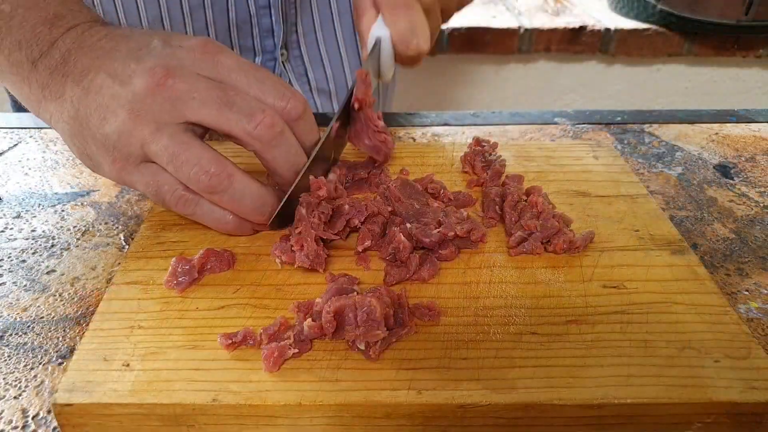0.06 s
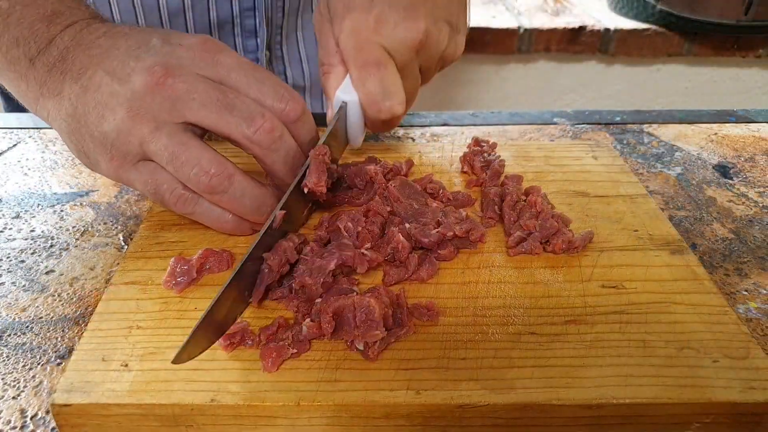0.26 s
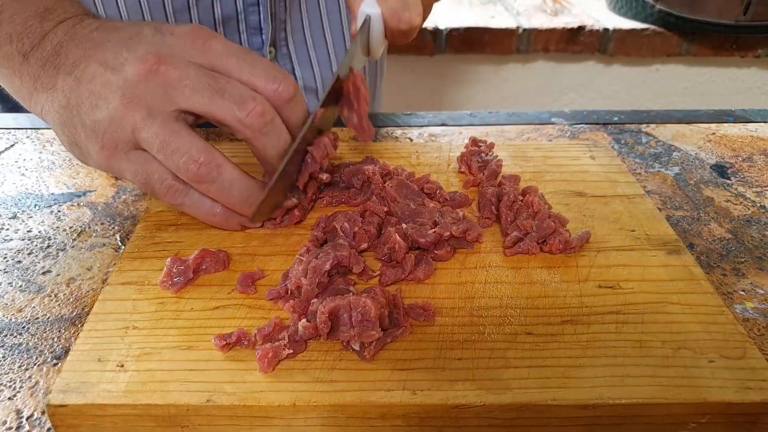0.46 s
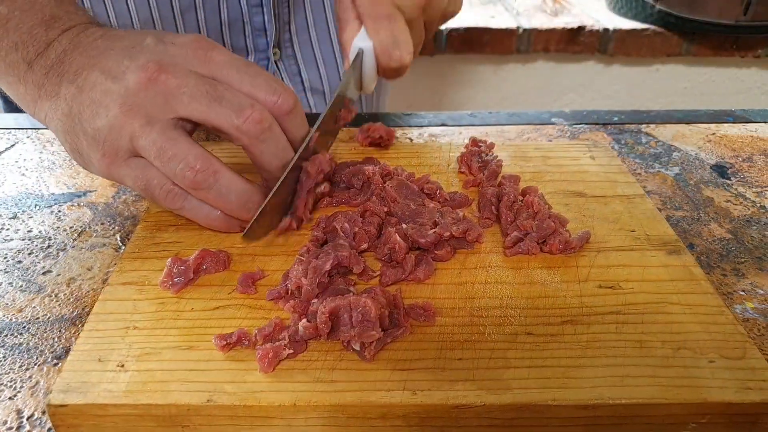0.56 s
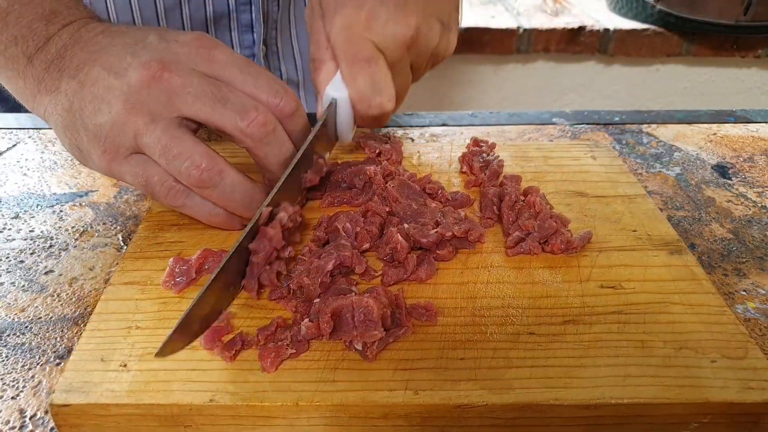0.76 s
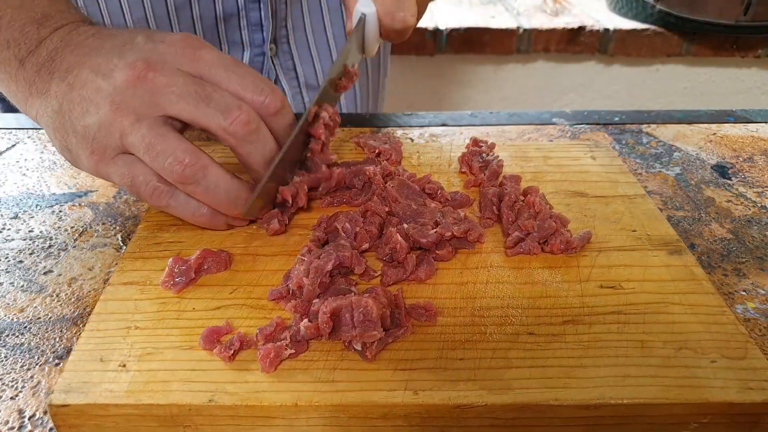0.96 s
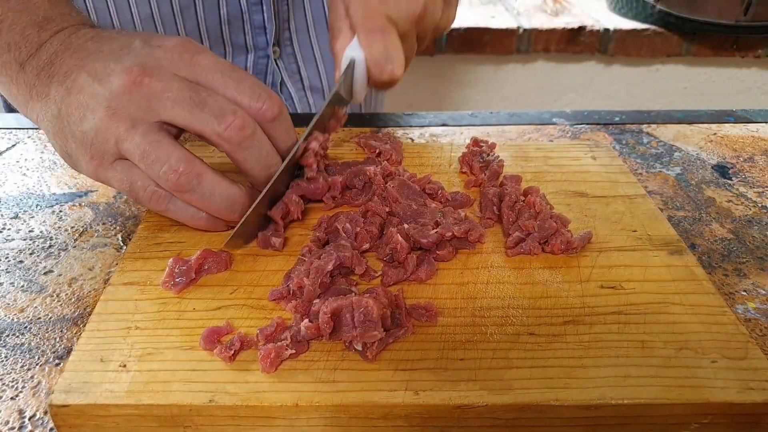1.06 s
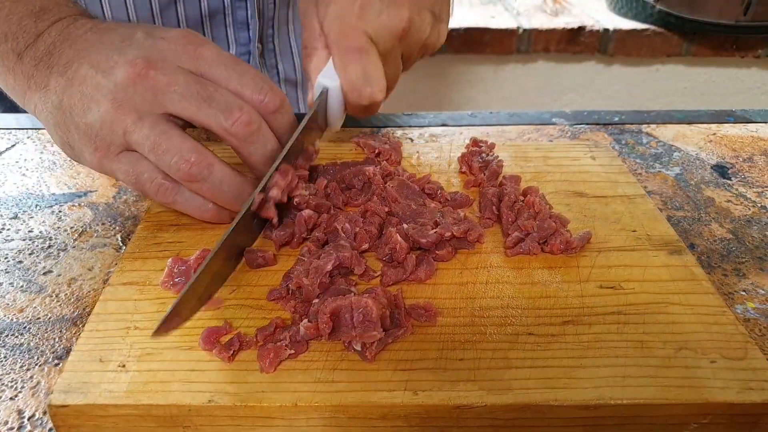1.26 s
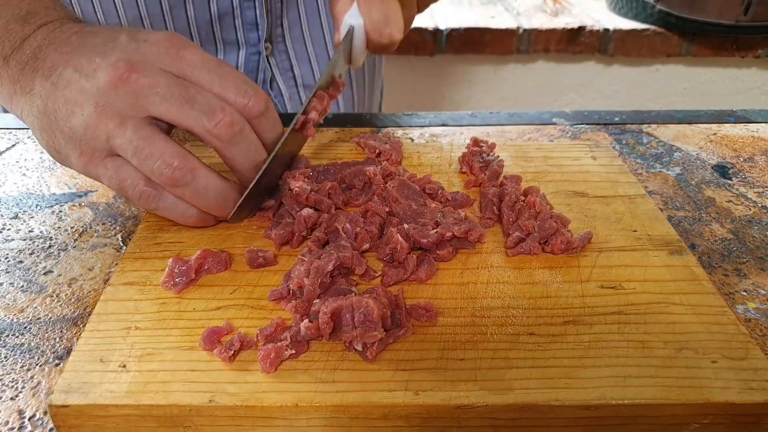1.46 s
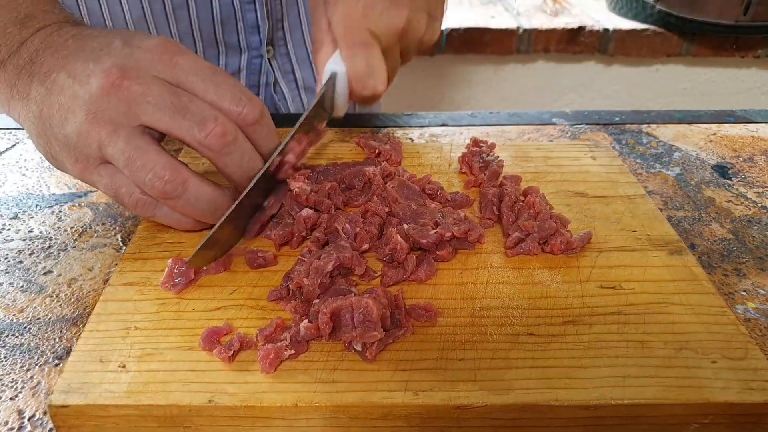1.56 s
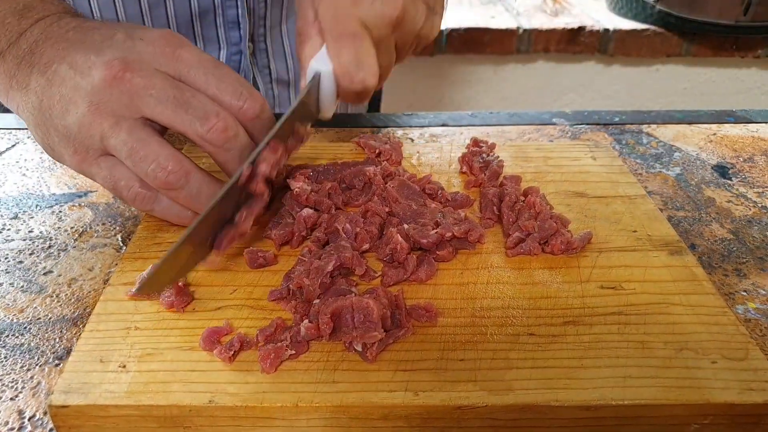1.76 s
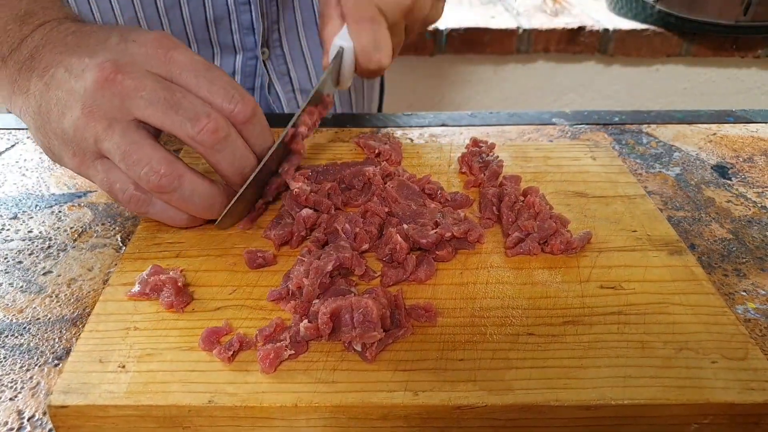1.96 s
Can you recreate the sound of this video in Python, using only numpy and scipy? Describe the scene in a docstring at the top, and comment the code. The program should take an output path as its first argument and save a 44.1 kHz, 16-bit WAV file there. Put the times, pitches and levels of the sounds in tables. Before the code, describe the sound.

Close up in a kitchen, a blade knocks four times on a wooden board through raw meat, the first knock loudest and sharpest, each with a brief hissing scrape, tiny wet ticks and quiet low hum behind.

```python
"""A large knife chops raw meat on a wooden board close to a two-port microphone, four times in two seconds.
Each knock sums the board's decaying modes; the slide adds separate noises for edge hiss, board and blade.
The sticky meat ticks in short noise bursts as its fibres let go. A decaying noise tail gives the room's
answer, and a low rumble with a wavering hum and faint air noise fill the kitchen."""
import sys
import numpy as np
from scipy import signal
from scipy.fft import rfft, irfft, next_fast_len
from scipy.io import wavfile
from scipy.ndimage import uniform_filter1d, map_coordinates

SR = 44100
rng = np.random.default_rng(int(sys.argv[2]) if len(sys.argv) > 2 else 0)


def to_wav(s):
    """Save 16-bit WAV."""
    ch = np.atleast_2d(s).T  # columns
    pcm = np.round(np.clip(ch, -1, 1) * 32767)  # PCM
    wavfile.write(sys.argv[1], SR, pcm.astype(np.int16))


def volts_from_db(level):
    """Convert decibel levels to linear amplitude ratios."""
    exponent = np.asarray(level, float) / 20
    return 10 ** exponent


N = 88200  # samples, two seconds


def unit(x):
    """Normalisation: scales a signal to rms 1."""
    return x / np.sqrt(np.mean(x ** 2) + 1e-20)


def along(points, hz):
    """Spectral envelope: interpolates (Hz, value) points along a logarithmic frequency axis."""
    f, v = np.transpose(points)
    return np.interp(np.log(hz + 1), np.log(f + 1), v)


def curves(rows):
    """Time envelopes: one value per sample for each column after the time."""
    s, *columns = np.transpose(rows)
    return [np.interp(np.arange(N) / SR, s, column) for column in columns]


def wobble(rate):
    """Random modulation: a smooth curve through normal random knots, rate knots a second."""
    knots = rng.standard_normal(int(N * rate / SR) + 4)
    return map_coordinates(knots, [np.arange(N) * rate / SR])


def filtered(x, response):
    """Linear filtering: multiplies the spectrum by a complex response of frequency."""
    m = next_fast_len(N + SR // 2)
    hz = np.fft.rfftfreq(m, 1 / SR)
    return irfft(rfft(x, m) * response(hz), m)[..., :N]


def pair(alike, gain):
    """Interchannel coherence: the mid/side balance sets how alike two coloured noises are; joint rms 1."""
    def mid_side(hz):
        angle = np.arccos(np.clip(along(alike, hz), -1, 1)) / 2
        return gain(hz) * [np.cos(angle), np.sin(angle)]

    mid, side = filtered(rng.standard_normal((2, N)), mid_side)
    return unit(np.array([mid + side, mid - side]))


def patchy(x, patch_db):
    """Random spectro-temporal modulation: gain patches over time and frequency, then rms 1."""
    z = signal.stft(x, nperseg=512)[2]
    field = rng.standard_normal(z.shape[1:])
    field = uniform_filter1d(uniform_filter1d(field, 3, 0), 5, 1)
    return unit(signal.istft(z * volts_from_db(patch_db * unit(field)), nperseg=512)[1][:, :N])


# The main blows of the edge on the board.
# Each row: start in seconds, peak level in dB, hardness in dB per doubling of (1 + Hz / HARD_HZ).
KNOCKS = [(.2104, -15, 6), (.7055, -18, -1.5), (1.1771, -21, 1.5), (1.6535, -22, -3)]
# Light touches of the edge. Each row: start in seconds, peak level in dB, hardness as for the knocks.
TAPS = [(.178, -43, 6), (.677, -45, 0), (.693, -35, 3), (.728, -39, 0), (.742, -40, 0), (1.152, -44, 0),
        (1.167, -42, -2), (1.196, -40, 0), (1.641, -44, -2), (1.738, -36, 0)]
# Modes of the wooden board. Each row: frequency in Hz, relative level in dB, t60 in seconds.
BOARD_MODES = [(80, -25, 0.088), (162, -24, 0.065), (221, -21, 0.063), (352.3, -20, 0.058),
               (487, -12.5, .025), (665.6, 4.5, 0.011), (776, -5.5, 0.0077), (1020, -15, 0.021),
               (1268, -15, 0.015), (1456, -26, 0.021), (1905, -10.5, 0.005), (2174, -20.5, 0.014),
               (2510, -16.5, 0.011), (3266, -28, 0.034), (3662, -28, 0.019)]
# The blade settles. Each row: start in seconds, level in dB before the rise, frequency in Hz, t60 in seconds.
CLACKS = [(.002, -37.5, 1195, 0.025), (0.011, -49.5, 1574, 0.041), (0.019, -48, 1400, 0.016)]
ATTACK_CYCLES = 1.1  # time constant of each mode's rise
DIP_CYCLES = 0.12  # the first dip lasts this much beyond a quarter cycle
HARD_HZ = 1000  # hardness acts mainly above this


def board():
    """Modal synthesis: a blow excites decaying modes, dip first; a hard blow favours the upper ones."""
    out, t = np.zeros(N + SR), np.arange(SR // 5) / SR

    def rise(hz):
        return 1 - np.exp(-t * hz / ATTACK_CYCLES)

    for rows, scatter_db in ((KNOCKS, 1), (TAPS, 3)):
        for s, db, hard_db in rows:
            ring = np.zeros(len(t))
            for hz, mode_db, t60 in BOARD_MODES:
                level_db = mode_db + rng.normal(0, scatter_db) + hard_db * np.log2(1 + hz / HARD_HZ)
                swing = np.cos(2 * np.pi * (hz * t - DIP_CYCLES))
                ring += rise(hz) * volts_from_db(level_db - 60 * t / t60) * swing
            out[round(s * SR):][:len(t)] -= volts_from_db(db) * ring / np.abs(ring).max()
    for s, db, hz, t60 in CLACKS:
        out[round(s * SR):][:len(t)] += rise(hz) * volts_from_db(db - 60 * t / t60) * np.sin(2 * np.pi * hz * t)
    return np.array([out[:N], out[:N]])


# The edge moving through meat and over wood, one list per chop.
# Each row: time in seconds, hiss level in dB, pressure on the board in dB,
# contact along the blade from 0 (heel) to 1 (tip).
STROKES = [
    [(0, -65, 8, 0.78), (.025, -70.5, 10, 0.84), (.056, -91, 1, .5), (.144, -73.5, -2, 0.46),
     (.158, -72, 2.5, 0.58), (.196, -59.5, 7, .3), (.214, -46.5, 4, .1), (.25, -48.5, -2.5, 0.068),
     (.28, -47.5, -3.5, 1), (.32, -52, -3.5, 0.96), (.348, -55, -3, 0.77), (.357, -69.5, 3, 1),
     (.42, -74.5, 4.5, 1), (.5, -94, 2, 0.66)],
    [(.57, -81.5, 3, 0.75), (.65, -72, -1, 0.82), (.682, -68, 8, 0.22), (.706, -48.5, 5, 0.06),
     (.74, -48, -3.5, 0.045), (.77, -47.5, -4.5, .9), (.804, -50, -5.5, 1), (.82, -56, 2, .9),
     (.836, -70, 5.5, .8), (.9, -77.5, 5, 0.4), (1, -86.5, 0, .5)],
    [(1.08, -82, -9, .5), (1.132, -73.5, -7, 0.42), (1.16, -59.5, 2, .4), (1.18, -49, 1, 0.12),
     (1.23, -48, -4.5, .1), (1.262, -47, -4.5, 0.67), (1.29, -53, 0.5, .9), (1.312, -60, 6, .9),
     (1.328, -78, 14, .7), (1.355, -67.5, 2, 0.7), (1.41, -76.5, 8, 0.42), (1.5, -95, 6, .5)],
    [(1.57, -83, 3, 0.54), (1.614, -74.5, 0, 0.61), (1.646, -61.5, 11, 0.49), (1.656, -48, -2, .1),
     (1.7, -49, -2, 0.11), (1.742, -47.5, -7, 0.64), (1.776, -56, 4.5, 0.6), (1.788, -69, -8, .7),
     (1.85, -85.5, 19.5, 0.39), (1.96, -89, 0, .5), (2, -84, -2, .5)],
]
# Colour of the hiss. Each row: frequency in Hz, relative level in dB per Hz.
HISS_COLOUR = [(880, -57), (1500, -20), (1940, -15), (2120, -6), (2430, -9), (3110, -4.5), (3470, -3.5),
               (3750, -3), (4140, -3.5), (5730, -8.5), (6140, -9.5), (7470, -13.5), (8660, -9.5),
               (10800, -10), (14200, -11.5), (15800, -15.5)]
# Board resonances under the edge. Each row: frequency in Hz, width in Hz, relative level in dB.
RUB_MODES = [(716, 397, 1.5), (970, 200, 1), (1263, 71, -1), (1790, 220, -10), (2187, 270, -8),
             (2560, 230, -10)]
# Blade resonances. Each row: frequency in Hz, width in Hz, relative level in dB with contact at the heel,
# relative level in dB with contact at the tip.
BLADE_MODES = [(2845, 210, -7, -3), (3187, 300, -7, 3), (3612, 300, -1, -5), (3737, 80, 0, -12),
               (4200, 240, -10.5, -10.5), (5010, 170, -10, -7), (5465, 170, -9, -11), (6234, 77, -17, -14)]
# Coherence of the knife's noises. Each row: frequency in Hz, left-right likeness from 0 to 1.
NEAR_ALIKE = [(100, 0.85), (800, 0.76), (1500, 0.9), (3000, 0.33), (8000, 0.17), (15000, 0.15)]
RUB_DB, BLADE_DB = -0.5, -2  # board and blade over the hiss at 0 dB pressure
GRIT_DB, PATCH_DB = 0.5, 3.5  # scale of the hiss's fast modulation and of its gain patches
FLICKER_DB = 2.5  # board and blade resonances come and go
BLADE_SHARE = 0.57  # of the pressure swing in dB that reaches the blade


def slide():
    """Friction noise: gritty hiss with separate board and blade noise bands, weighted by pressure and contact."""
    hiss_db, press_db, contact = curves(np.concatenate(STROKES))
    tipward = np.clip(contact, 0, 1)

    grit = volts_from_db(GRIT_DB * wobble(900) + 2.15 * wobble(60.03))
    hiss = grit * patchy(pair(NEAR_ALIKE, lambda hz: volts_from_db(along(HISS_COLOUR, hz))), PATCH_DB)

    def wood(f):
        total = 0
        for k, (centre, width, db) in enumerate(RUB_MODES):
            damping = 1j * f * width
            # neighbouring resonances have opposite signs
            total = total + (-1) ** k * volts_from_db(db) * damping / (centre ** 2 - f ** 2 + damping)
        return total

    rub = volts_from_db(FLICKER_DB * wobble(90)) * pair(NEAR_ALIKE, wood)

    blade = 0
    for hz, width, heel_db, tip_db in BLADE_MODES:
        level_db = heel_db + (tip_db - heel_db) * tipward + FLICKER_DB * wobble(45.2)
        band = pair(NEAR_ALIKE, lambda f: 1 / (1 + (2 * (f - hz) / width) ** 2))
        blade = blade + volts_from_db(level_db) * band

    rub_part = volts_from_db(press_db + RUB_DB) * unit(rub)
    blade_part = volts_from_db(BLADE_SHARE * press_db + BLADE_DB) * unit(blade)
    # the three noises are independent but share one level curve
    return volts_from_db(hiss_db) * (unit(hiss) + rub_part + blade_part)


# Sticky meat letting go. Each row: time in seconds, level in dB before TICK_TRIM_DB,
# dull part in dB over the bright part.
TICKS = [(0.1074, -70, -10), (0.132, -65, -10), (0.151, -62, -18), (0.158, -48, -21), (0.1672, -53.5, 8),
         (0.1784, -52.5, 10), (0.3442, -49, 8.5), (0.3894, -62, -10), (0.4372, -66.5, -10),
         (0.562, -67, -10), (0.5853, -59, 6), (0.5885, -54, 0), (0.6206, -52, -10), (0.6571, -48, -1),
         (0.6933, -49, -4.5), (0.8574, -70, -10), (1.0792, -66.5, -13), (1.3523, -71, -13),
         (1.368, -65, -13), (1.5574, -68.5, -6), (1.5988, -61, -6), (1.6531, -43, -3), (1.8194, -63, -10),
         (1.8776, -66.5, -10)]
# Colour of the bright part. Each row: frequency in Hz, relative level in dB.
BRIGHT_COLOUR = [(4000, -36), (5500, -28), (9000, 4), (11500, -8), (14000, -8), (16000, -13.5)]
# Colour of the dull part. Each row: frequency in Hz, relative level in dB.
DULL_COLOUR = [(1200, -22), (2500, -25), (3600, -19), (5000, -25), (7000, -24)]
TICK_TRIM_DB = -2
TICK_T60_S, TICK_LEAD_S = 0.0091, 0.0018  # 60 dB of dying away, and of the soft rise before


def meat():
    """Impulsive release: wet fibres let go in tiny noise bursts, each with a bright and a dull part."""
    t, bright, dull = np.arange(N) / SR, 0, 0
    for s, db, dull_db in TICKS:
        span = np.where(t >= s, TICK_T60_S, TICK_LEAD_S)
        shape = volts_from_db(db + TICK_TRIM_DB - 60 * np.abs(t - s) / span)
        bright = bright + shape
        dull = dull + volts_from_db(dull_db) * shape
    bright_noise = patchy(pair(NEAR_ALIKE, lambda hz: volts_from_db(along(BRIGHT_COLOUR, hz))), patch_db=4)
    dull_noise = pair(NEAR_ALIKE, lambda hz: volts_from_db(along(DULL_COLOUR, hz)))
    return bright * bright_noise + dull * dull_noise


# Decay of the room. Each row: frequency in Hz, t60 in seconds.
ROOM_DECAY = [(200, 0.26), (1000, 0.27), (10000, 0.27)]
# Coherence of the kitchen's sound. Each row: frequency in Hz, left-right likeness from 0 to 1.
FAR_ALIKE = [(40, 0.9), (90, 1), (170, 0.76), (400, 0.7), (1500, 0.17), (8000, 0.24)]


def kitchen(x):
    """Reverberation: convolution with a noise tail in which each frequency dies at its own speed."""
    noise = pair(FAR_ALIKE, np.ones_like)[:, :SR // 2]
    hz, t, z = signal.stft(noise, SR, nperseg=256)
    decay = volts_from_db(-60 * t / along(ROOM_DECAY, hz)[:, None])
    tail = signal.istft(z * decay, SR, nperseg=256)[1]
    tail = tail / np.linalg.norm(tail[0])
    delayed = np.pad(x, ((0, 0), (250, 0)))  # samples before the room answers
    return signal.fftconvolve(delayed, tail, axes=1)[:, :N]


# The rumble rises and falls. Each row: time in seconds, level in dB.
SWELL = [(0.0, -52.5), (0.04, -56), (0.09, -48), (0.15, -59), (0.18, -48), (0.23, -43), (0.26, -53.5),
         (0.41, -51.5), (0.45, -61.5), (0.7, -50), (0.71, -43.5), (0.76, -56), (0.89, -54), (1.03, -59.5),
         (1.07, -54.5), (1.09, -49), (1.28, -53), (1.3, -59), (1.49, -55.5), (1.63, -58), (1.66, -42.5),
         (1.7, -50), (1.77, -51), (1.88, -57.5), (1.98, -55.5), (2.0, -51)]
# Colour of the rumble. Each row: frequency in Hz, relative level in dB per Hz.
RUMBLE_COLOUR = [(12, -74), (20, -35), (27, -33.5), (40, -18.5), (54, 0.5), (86, -4), (116, -9), (145, -24),
                 (166, -9.5), (300, -22.5), (390, -63), (660, -120)]
# Wavering low hum. The row: frequency in Hz, scale of the waver in Hz, level in dB over the rumble.
HUM = (60, 3.06, -3.6)
# The air drifts. Each row: time in seconds, air level in dB over AIR_DB, change of the thin hiss in dB.
DRAUGHT = [(0, 3.5, 4), (.1, 4.5, 0.5), (.4, 2.5, 6.5), (.6, 3.5, 10), (.9, -1.5, -11), (1.05, 0, -5),
           (1.4, 2, -6), (1.55, 3.5, 1), (1.85, 2, -4), (2, 0.5, -7)]
# Colour of the air. Each row: frequency in Hz, relative level in dB per Hz.
AIR_COLOUR = [(150, 4.5), (250, -6.5), (414, -2), (519, -2), (748, -15), (922, -17.5), (1330, -15.5),
              (1610, -20), (2810, -19.5), (3340, -19.5), (3910, -31.5), (4570, -30), (16000, -51)]
# Thin band of hiss. The row: frequency in Hz, width in Hz, level in dB over AIR_DB before the drift.
THIN = (3430, 500, -19.5)
AIR_DB = -61.5


def background():
    """Ambient noise: a lumpy rumble with a frequency-modulated hum, drifting air and a thin band of hiss."""
    hum_hz, waver_hz, hum_db = HUM
    cycles = np.cumsum(hum_hz + waver_hz * wobble(8)) / SR + rng.random()
    hum = volts_from_db(hum_db) * np.sqrt(2) * np.sin(2 * np.pi * cycles)
    low_noise = pair(FAR_ALIKE, lambda hz: volts_from_db(along(RUMBLE_COLOUR, hz)))
    rumble = volts_from_db(curves(SWELL)[0]) * (hum + low_noise)

    air_db, drift_db = curves(DRAUGHT)
    air = volts_from_db(air_db + 2.4 * wobble(4.99)) * pair(FAR_ALIKE, lambda hz: volts_from_db(along(AIR_COLOUR, hz)))
    thin_hz, width, thin_db = THIN
    thin_noise = pair(FAR_ALIKE, lambda hz: 1 / (1 + (2 * (hz - thin_hz) / width) ** 4))
    thin = volts_from_db(thin_db + drift_db) * thin_noise
    return rumble + volts_from_db(AIR_DB) * (air + thin)


def scene():
    """Superposition: the direct knife, its reverberation weighted by -16 dB, and the kitchen behind."""
    knife = board() + slide() + meat()
    return knife + volts_from_db(-16) * kitchen(knife) + background()


def band_limit(x):
    """A steep low-pass at the top of the band."""
    return signal.sosfilt(signal.butter(12, 16480, fs=SR, output="sos"), x)


# Colour of the two ports. Each row: frequency in Hz, left over right in dB.
PORTS = [(60, -1), (78, -1.0), (100, -0.5), (130, -2), (170, -3), (220, 3.5), (290, -5.5), (380, -1.5),
         (490, 1), (640, 1), (830, 0.0), (1080, -2), (1410, 0.5), (1830, -5), (2380, -0.5), (3100, -7.5),
         (4030, -6.5), (5240, 0.5), (6820, -6), (8870, 6), (11500, -3), (15000, -10.5)]
LEAD_S, LEAD_FROM_HZ = 0.00014, 1100  # the left port hears the treble first, above about this frequency
LOW_CUT_HZ, TOP_HZ = 35, 15780


def record(dry):
    """Two-port reception: level and time differences between the ports, within a limited band."""
    half = np.array([[.5], [-.5]])  # each port takes half of every difference

    def response(hz):
        colour = volts_from_db(half * along(PORTS, hz))
        lead = half * LEAD_S / (1 + (LEAD_FROM_HZ / (hz + 1)) ** 4)
        low_cut = (1j * hz / (LOW_CUT_HZ + 1j * hz)) ** 2
        return colour * np.exp(2j * np.pi * hz * lead) * (hz < TOP_HZ) * low_cut

    return band_limit(filtered(dry, response))


dry = scene()
out = record(dry)
to_wav(out)
```